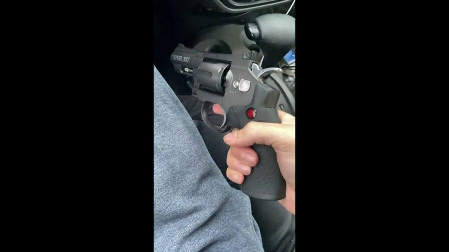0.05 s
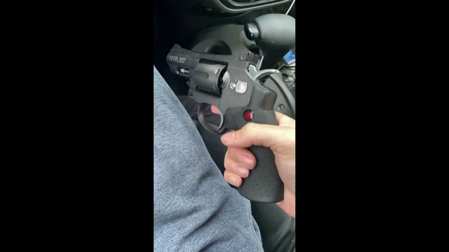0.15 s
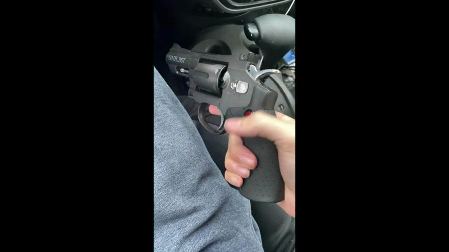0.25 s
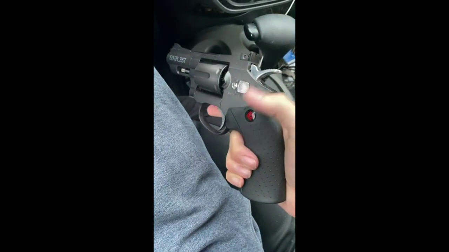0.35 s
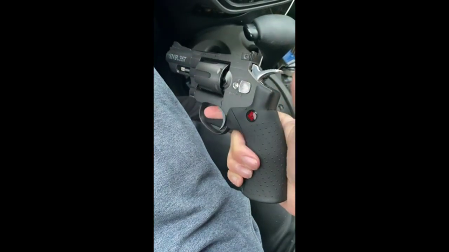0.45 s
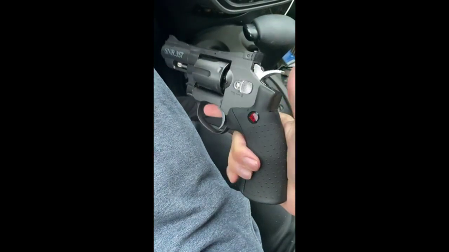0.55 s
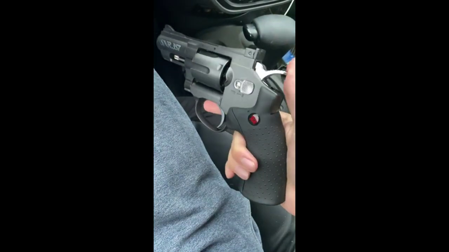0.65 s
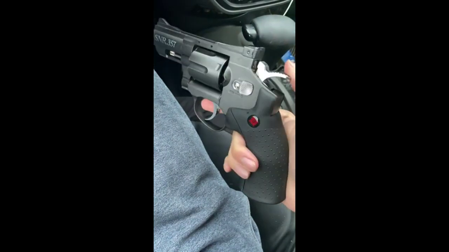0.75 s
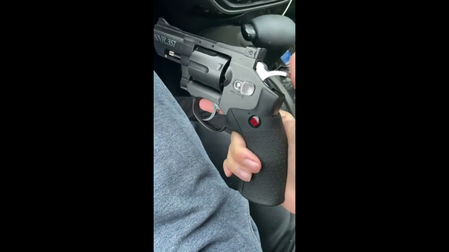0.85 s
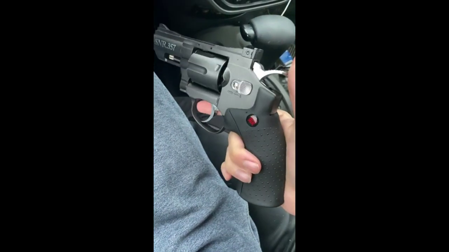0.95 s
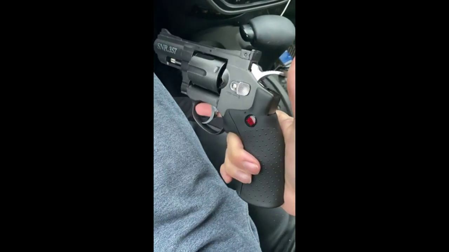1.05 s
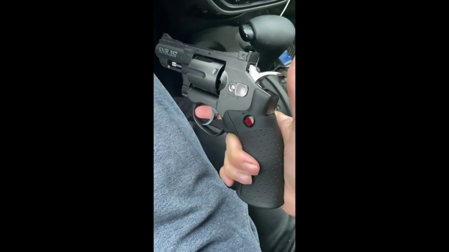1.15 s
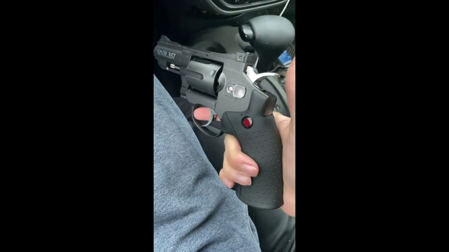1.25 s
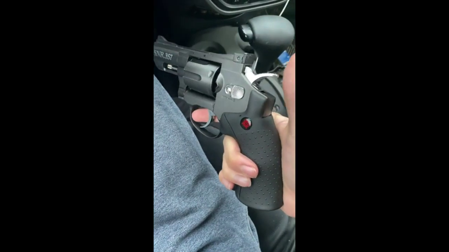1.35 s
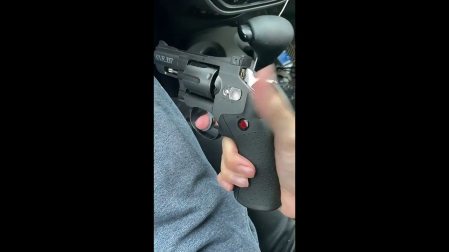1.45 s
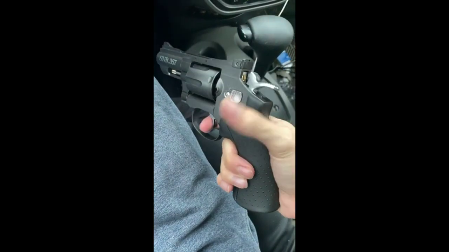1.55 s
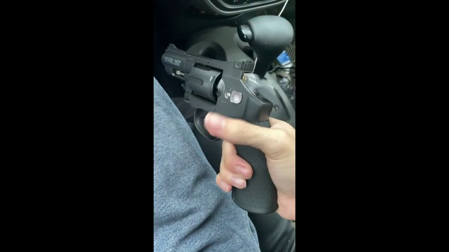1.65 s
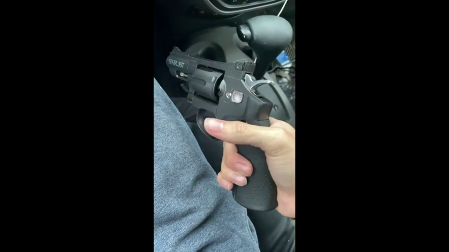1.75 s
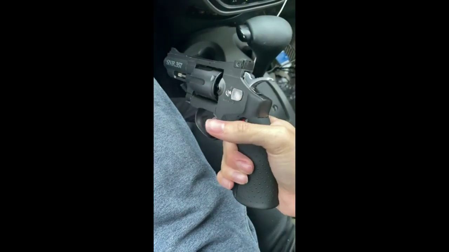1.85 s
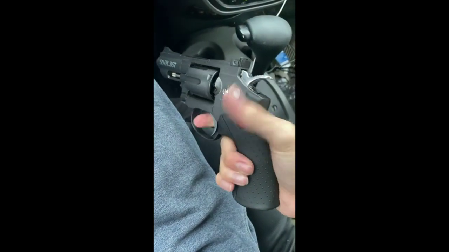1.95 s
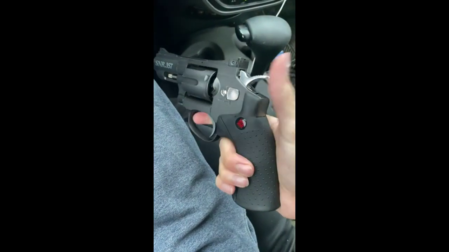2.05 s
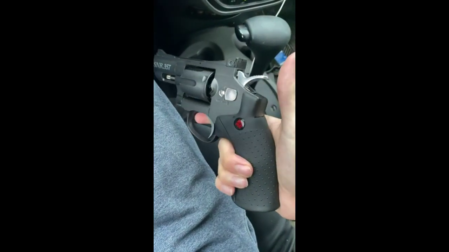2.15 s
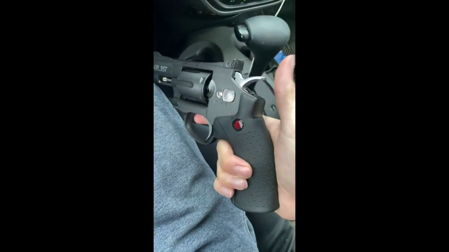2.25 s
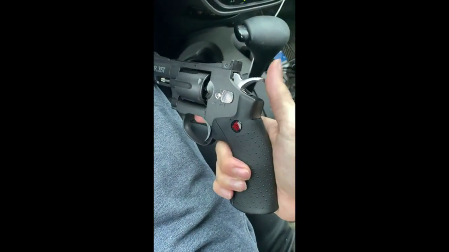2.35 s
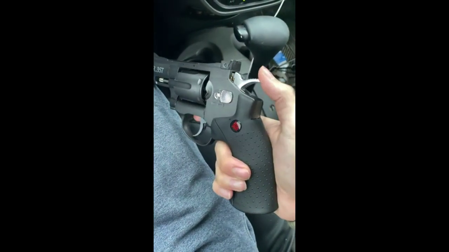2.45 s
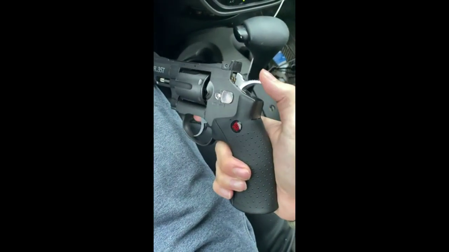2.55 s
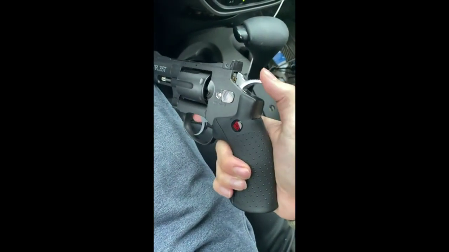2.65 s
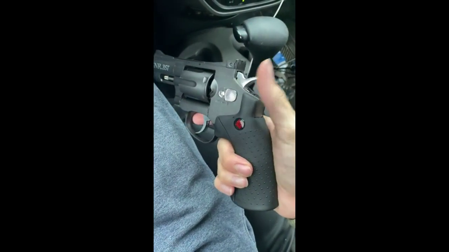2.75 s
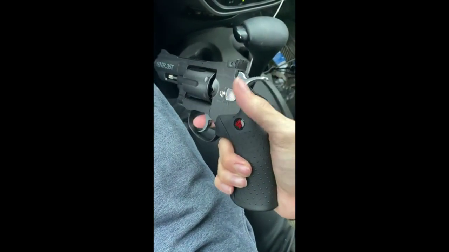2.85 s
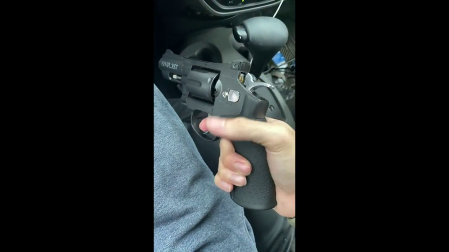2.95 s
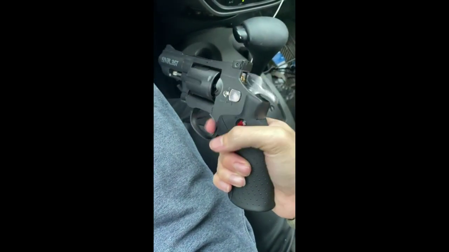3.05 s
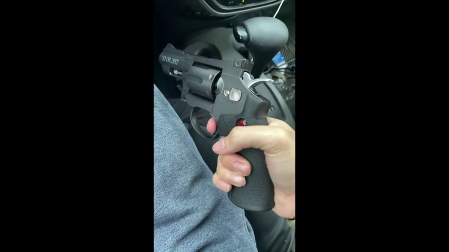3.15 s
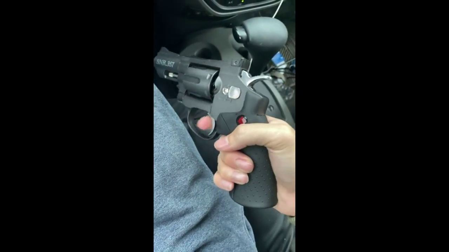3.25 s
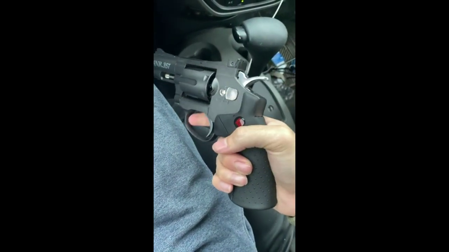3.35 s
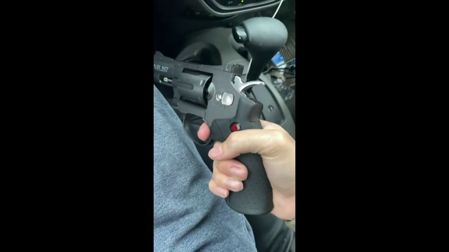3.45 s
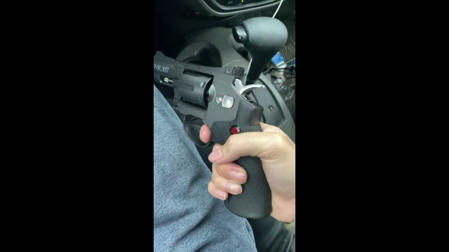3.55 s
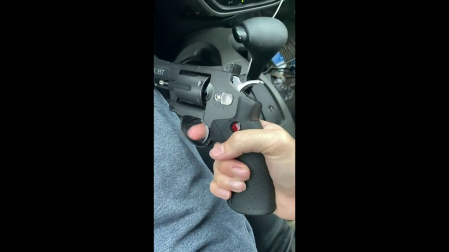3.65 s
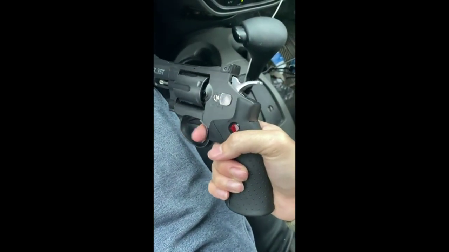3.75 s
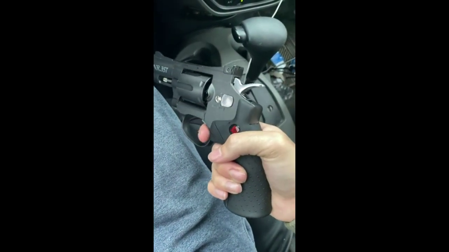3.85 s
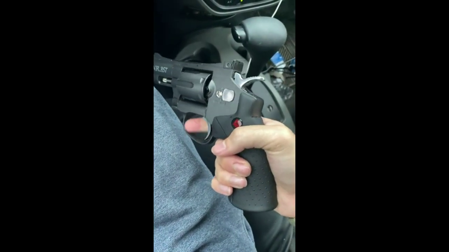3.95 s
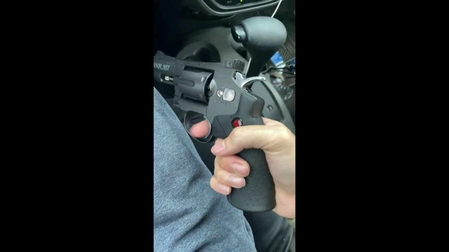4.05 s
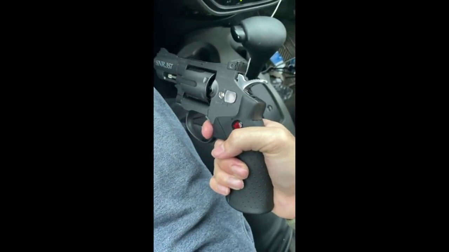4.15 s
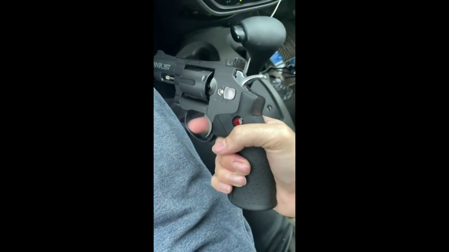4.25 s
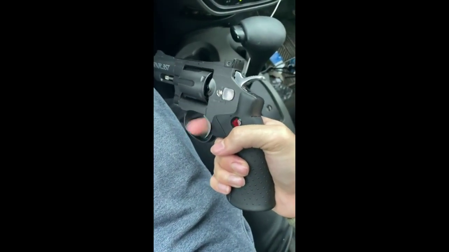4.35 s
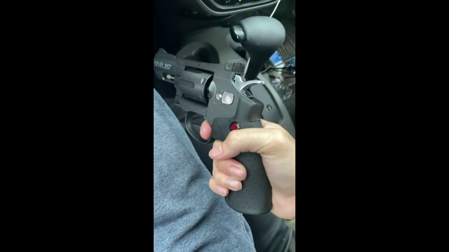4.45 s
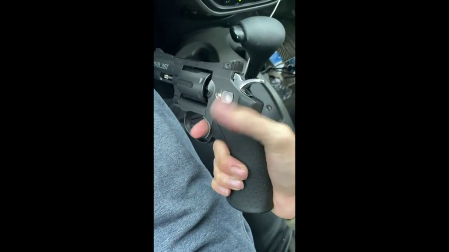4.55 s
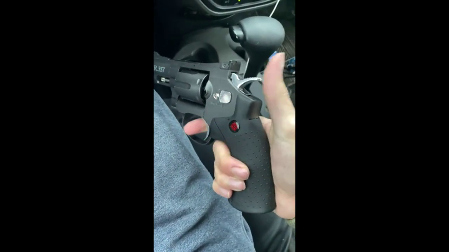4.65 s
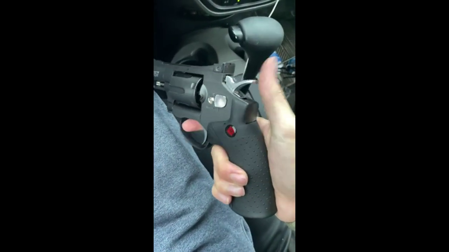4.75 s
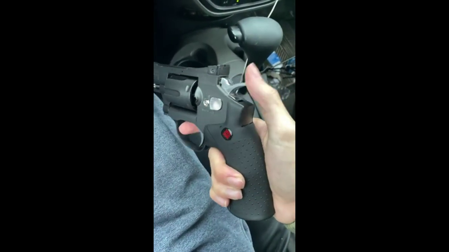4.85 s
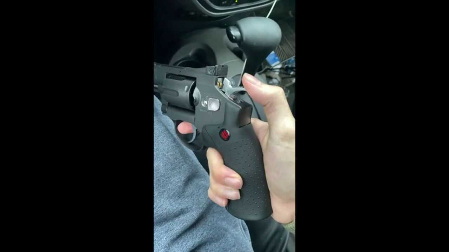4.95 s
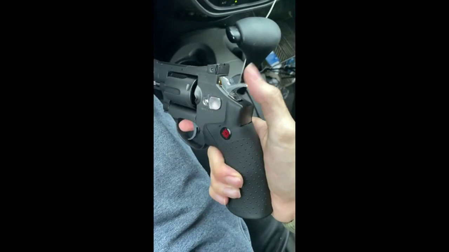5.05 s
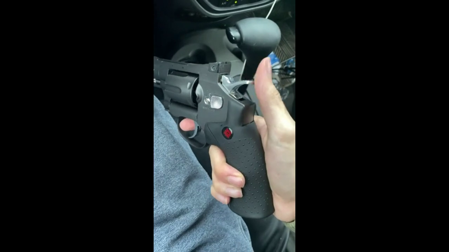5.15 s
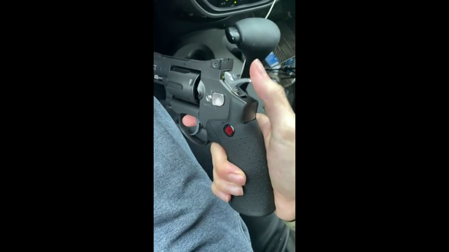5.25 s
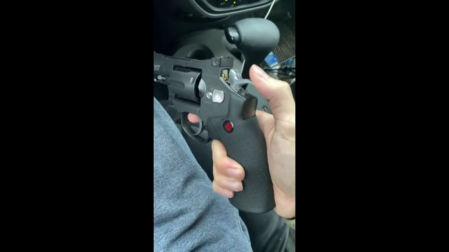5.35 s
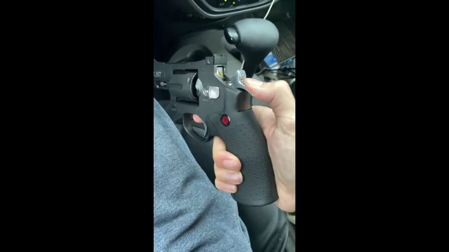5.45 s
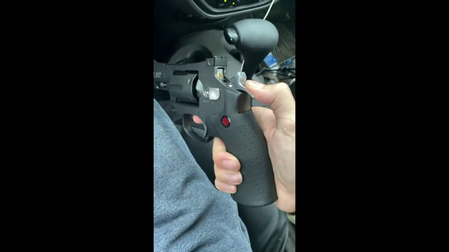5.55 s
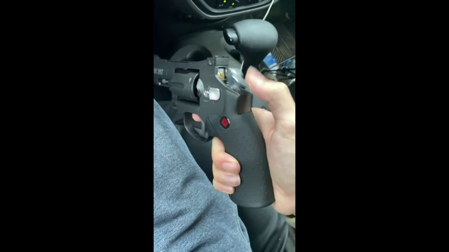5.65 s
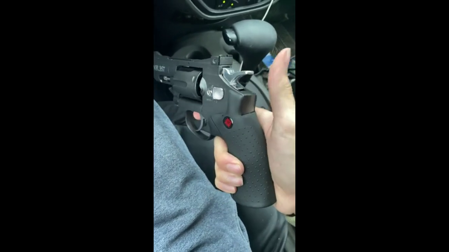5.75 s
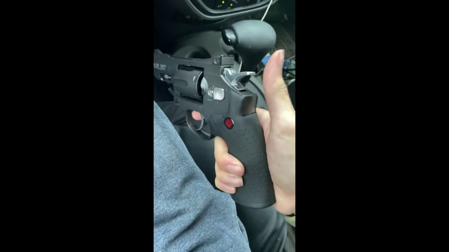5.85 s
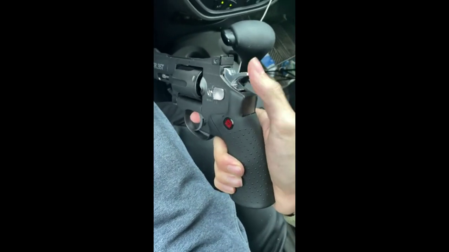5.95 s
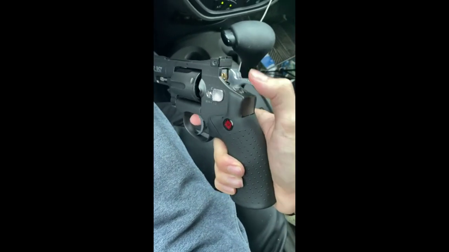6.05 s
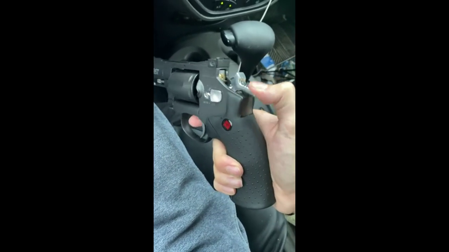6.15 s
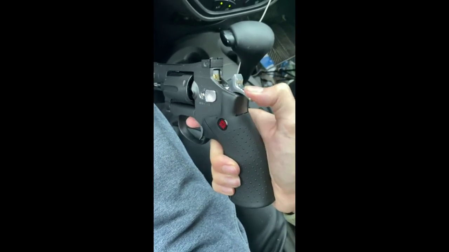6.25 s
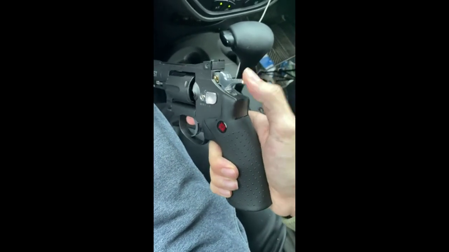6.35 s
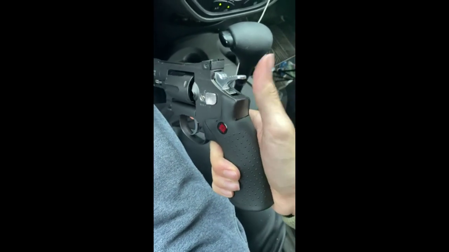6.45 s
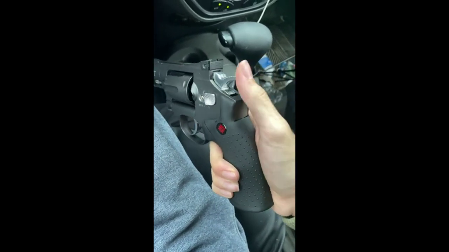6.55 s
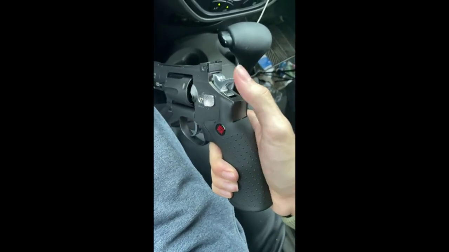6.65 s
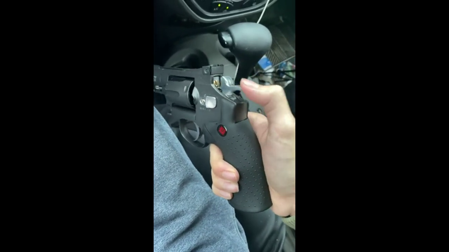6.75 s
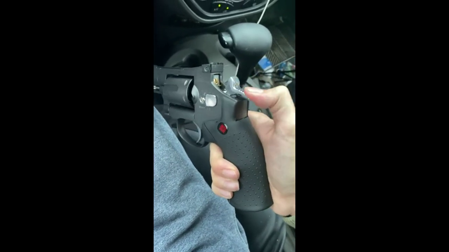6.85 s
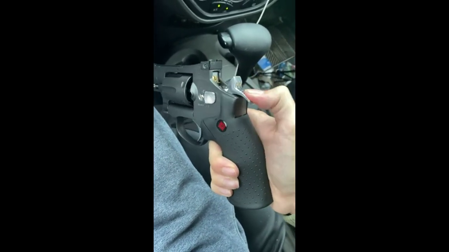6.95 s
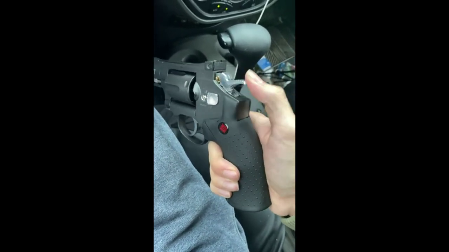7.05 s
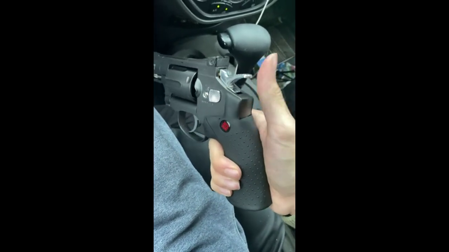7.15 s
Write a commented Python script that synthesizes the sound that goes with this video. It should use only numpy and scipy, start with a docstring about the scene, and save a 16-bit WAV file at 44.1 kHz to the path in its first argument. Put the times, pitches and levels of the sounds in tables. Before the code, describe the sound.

Close up in an idling car, a hand works an empty air revolver. Four loud hammer snaps ring briefly on the metal frame, then the loose trigger ticks faintly. Another hard snap follows, then quieter cylinder and trigger knocks with short ratcheting slides. Low engine boom, fan air and slight skin rustle continue underneath. A phone-like microphone briefly ducks the engine at loud hits.

```python
"""An air revolver is cocked and dry-fired in the driver's seat of an idling car, close to a phone.
Hammer, cylinder latch and trigger linkage strike one metal frame: noisy cracks, then short decaying modes.
Steel slides as streams of tiny slips, skin rustles as filtered noise, and the mainspring sings faintly.
The engine booms as sines on the crank rate under a fan tone and cabin noise; a limiter ducks loud bursts."""
import sys
import numpy as np
from scipy import signal
from scipy.fft import rfft, irfft
from scipy.io import wavfile
from scipy.ndimage import uniform_filter1d, minimum_filter1d

SR = 44100
rng = np.random.default_rng(int(sys.argv[2]) if len(sys.argv) > 2 else 0)


def waveform_to_disk(signal):
    """Save audio, clipped to [-1, 1], as 16-bit WAV at the path in sys.argv[1]."""
    frames = np.transpose(np.atleast_2d(signal))
    scaled = np.clip(frames, -1, 1) * 32767
    samples = np.round(scaled).astype(np.int16)
    wavfile.write(sys.argv[1], SR, samples)


N = 317520
HIT_SIZE = 4608  # length of one metal contact, samples
SIDES = np.array([[1], [-1]])  # left, right

# Levels of blows are relative drives; brightness and thump are strengths of the curves in blow().
# Hammer falls. Each row: fall in seconds, level in dB, brightness in dB, thump in the grip in dB,
# trip of the sear in dB, rebound after in seconds, rebound level in dB, rebound brightness in dB.
HAMMER_FALLS = [(0.6825, -4, 10, 4, -15.5, 0.0051, -3.5, -0.5), (1.6109, -1.5, 5, 5, -3.5, .0094, 3, -2),
                (2.4408, 1, 3, 4, -11.5, .0044, -3.5, 10.5), (3.0393, 2, 4.5, -0.5, -5.5, 0.011, 2.5, -1.5),
                (4.8345, -4, -1, 14.5, -17.5, .0028, 1, 13.5)]
# Knocks after the sear: the cylinder locks with a bright ping at 5.42 and 6.85 s; the others are duller
# trigger or hammer stops. Each row: knock in seconds, level in dB, brightness in dB, hollow body in dB,
# ping in dB, sear earlier by seconds, sear level in dB.
ACTION_STOPS = [(5.4197, -10.5, 3, 3, -8.5, 0.0053, -18), (5.6452, -13.5, -1.5, -12, -33, 0.0053, -10.5),
                (6.1525, -22, -7, -2.5, -37, 0.017, -14), (6.3401, -18.5, -4, -13, -22, .0214, -25),
                (6.8464, -10, 4.5, 4.5, -25, 0.0042, -21.5)]
# Single clicks of trigger and hammer. Each row: start in seconds, level in dB, brightness in dB.
CLICKS = [(0.2509, -59, -3), (0.8235, -27, -8.5), (1.4452, -31, 7), (1.457, -30, -7), (1.78, -50, -21.5),
          (2.409, -48, -11), (2.638, -49.5, -32), (2.6706, -38, -9.5), (2.832, -42, -24),
          (2.9134, -21.5, 4), (3.18, -47, -15.5), (5.0241, -37, -3), (5.054, -33, -5.5),
          (5.2553, -33.5, -18), (5.2912, -44, -19), (5.3305, -41.5, -13.5), (5.926, -55.5, -11),
          (6.0009, -21.5, 5), (6.6621, -32.5, -22), (6.6866, -32.5, 22.5), (6.7977, -29, 2),
          (7.0109, -20, 17), (7.0403, -24, 4)]
# Pulls on trigger or hammer: steel slides and the pawl chatters. Each row: start in seconds, end in seconds,
# sliding level at the end in dB, chatter level in dB, chatter brightness in dB.
ACTION_PULLS = [(0.672, 0.682, -37, -53, -6), (1.5897, 1.607, -32, -19, 5),
                (2.43, 2.439, -39.5, -49, -11.5), (3.0217, 3.035, -34, -21.5, -2),
                (4.817, 4.831, -45.5, -62, -8), (5.4008, 5.417, -35.5, -28.5, -7),
                (5.616, 5.64, -29.5, -27, -7), (5.9789, 6.036, -53.5, -36, -23),
                (6.1138, 6.15, -29, -23, -3), (6.2914, 6.339, -36, -25, 2), (6.647, 6.73, -68, -40, -18.5),
                (6.998, 7.069, -45, -35, -15)]
# Modes of frame and cylinder, before each blow's scatter. Each row: pitch in Hz, level in dB, T60 in seconds.
FRAME_MODES = [(1940, -24.5, .06), (2061, -23.5, .055), (2129, -16.5, 0.062), (2206, -22.5, 0.035),
               (2353, -25.5, 0.08), (2763, -26, .07), (3210, -27.5, 0.03), (3520, -29.5, 0.049),
               (4110, -23, .045), (4690, -26.5, .06), (5320, -20.5, 0.052), (5660, -24, .045),
               (5800, -20.5, 0.056), (5990, -17.5, 0.047), (6530, -21, 0.046), (9260, -24, 0.078),
               (9820, -23.5, 0.066), (12900, -29, .07)]


def undb(db):
    """Decibels to gain."""
    return 10 ** (np.asarray(db) / 20)


def fade(t, t60):
    """Exponential decay, 60 dB down after t60."""
    return np.exp(-np.log(1000) * t / t60)


def freqs(size):
    """Frequency of each bin of a spectrum, kept above zero."""
    return np.maximum(np.fft.rfftfreq(size, 1 / SR), 1)


def over_hz(points, hz):
    """Join (Hz, value) points on a log-frequency axis."""
    at, value = np.transpose(points)
    return np.interp(np.log(hz), np.log(at), value)


def walk(rate):
    """Random levels held 1 / rate seconds and slewed twice; spread near 1."""
    k = int(SR / rate)
    steps = np.repeat(rng.standard_normal(N // k + 1), k)
    return np.sqrt(2) * uniform_filter1d(uniform_filter1d(steps, k), k)[:N]


def add(out, s, sound):
    """Mix a sound in at time s."""
    start = int(s * SR)
    out[:, start:start + sound.shape[1]] += sound[:, :N - start]


def cabin(flicker_db=0.94):
    """Noise shaped into rumble, alike on both sides, and diffuse air from the vents."""
    # Rumble and fan air. Each row: frequency in Hz, level in dB per Hz.
    air_colour = [(20, -76.5), (55, -60.5), (90, -65.5), (135, -68.5), (200, -71.5), (310, -78.5),
                  (400, -74.5), (500, -81.5), (700, -88), (1100, -91.5), (2200, -103), (4200, -118),
                  (7000, -130), (10000, -128), (16000, -142)]
    # Likeness of the two sides. Each row: frequency in Hz, coherence from 0 to 1.
    side_likeness = [(60, 0.89), (130, 0.99), (290, 0.92), (640, 0), (1400, 0)]
    hz = freqs(N)
    alike = np.clip(over_hz(side_likeness, hz), 0, 1)
    mid, side = rfft(rng.standard_normal((2, N))) * undb(over_hz(air_colour, hz)) * np.sqrt(SR / 4)
    # left minus right, dB
    pan_db = over_hz([(200, 0.5), (380, -5.5), (700, 1), (1290, 3.5), (2400, -2), (8000, 1)], hz)
    stereo = mid * np.sqrt(1 + alike) + SIDES * side * np.sqrt(1 - alike)
    air = irfft(stereo * undb(SIDES * pan_db / 2), N)
    return air * undb(flicker_db * walk(9.7))


def blower(blade_hz=374.9, level_db=-54, pan_db=-3, waver=.002, flutter_db=2.4):
    """The blade tone of the heater fan: a sine wavering in pitch and level, stronger on the right."""
    angle = 2 * np.pi * np.cumsum(blade_hz * (1 + waver * walk(6))) / SR
    return np.sqrt(2) * np.sin(angle) * undb(level_db + flutter_db * walk(8.2) + SIDES * pan_db / 2)


def engine(wobble_db=2.5, jitter=0.54, firing_wobble_db=.3):
    """A four-cylinder idle: a firm boom at twice the crank rate, the other orders varying with uneven combustion."""
    # Each row: multiple of the crank rate, mean level in dB RMS.
    crank_orders = [(1, -55.5), (2, -27.5), (3, -42), (4, -51), (5, -49), (6, -55), (7, -56.5), (8, -60.5),
                    (9, -67)]
    firing_hz, hunt_hz, hunts_per_s = 47.85, .22, 2.2
    # two firings per turn, so the crank turns at half the firing rate
    crank = np.pi * np.cumsum(firing_hz + hunt_hz * walk(hunts_per_s)) / SR
    out = 0
    for order, db in crank_orders:
        unsteady_db, drift = (firing_wobble_db, 0) if order == 2 else (wobble_db, jitter)
        angle = order * crank + 2 * np.pi * rng.random() + drift * walk(8.3)
        out = out + np.sqrt(2) * undb(db + unsteady_db * walk(12)) * np.sin(angle)
    return out


def rustle(catch_db=1.14, rest_db=-82, work_db=-73.5, reach_s=.09):
    """Skin catches and slips on the grip as hiss, most around the moments when the action is worked."""
    # Colour of skin on the grip. Each row: frequency in Hz, relative level in dB.
    skin_colour = [(800, -13), (2200, 8), (5500, -1.5), (7500, -9.5), (10000, 1), (13000, -13.5),
                   (16000, -19)]
    t, effort = np.arange(N) / SR, np.zeros(N)
    for s, *_ in [*HAMMER_FALLS, *ACTION_STOPS, *CLICKS]:
        effort = np.maximum(effort, 1 / (1 + ((t - s) / reach_s) ** 2))
    hiss = irfft(rfft(rng.standard_normal((2, N))) * undb(over_hz(skin_colour, freqs(N))), N)
    level_db = rest_db + (work_db - rest_db) * effort + catch_db * walk(120)
    return hiss / hiss.std() * undb(level_db)


def hand(t60=0.16):
    """Dull thumps as the grip shifts: low sines that swell briefly and die away."""
    # Soft bumps. Each row: start in seconds, pitch in Hz, level before the envelope in dB.
    grip_bumps = [(6.777, 65.5, -16), (7.146, 71.7, -16.5)]
    out, t = np.zeros((2, N)), np.arange(SR // 2) / SR
    for s, hz, db in grip_bumps:
        envelope = fade(t, t60) * (1 - fade(t, 0.055))
        add(out, s, undb(db) * (np.sin(2 * np.pi * hz * t) * envelope)[None])
    return out


def ringing(modes, t, detune=0.0018, scatter_db=3):
    """Decaying modes; every blow and each microphone port weights them a little differently."""
    hz, db, t60 = np.transpose(modes)
    # the grip of the hand shifts each mode slightly
    hz = hz * (1 + detune * rng.standard_normal(len(hz)))
    poles = np.exp((2j * np.pi * hz - np.log(1000) / t60) / SR)
    size = undb(db + scatter_db * rng.standard_normal((2, len(hz))))
    phased = size * np.exp(2j * np.pi * rng.random((2, len(hz))))
    # powers of each pole spiral inward: a decaying sinusoid
    spirals = np.cumprod(np.repeat(poles[:, None], len(t), axis=1), axis=1)
    return np.einsum("cm,mt->ct", phased, spirals).imag


def mainspring(split_hz=45, pitch_hz=5300, t60_s=0.81):
    """A thin lingering tone from the coil behind the hammer after three of the jolts; its close modes beat."""
    # Each row: start in seconds, level of each mode before scatter in dB.
    spring_jolts = [(4.838, -75), (5.645, -80), (6.152, -79)]
    out, t = np.zeros((2, N)), np.arange(SR) / SR
    for s, db in spring_jolts:
        modes = [(hz, db, t60_s) for hz in (pitch_hz - split_hz, pitch_hz, pitch_hz + split_hz)]
        add(out, s, ringing(modes, t))
    return out


def patches(hz, width_hz, depth_db):
    """A gain that rises and falls at random along frequency."""
    knots = np.arange(0, SR / 2, width_hz)
    gain = undb(depth_db * np.interp(hz, knots, rng.standard_normal(len(knots))))
    return gain / np.sqrt(np.mean(gain ** 2))


def at_ports(spectrum, hz, lag_s=.000152):
    """The treble of the direct sound, above 3500 Hz, reaches the right port later."""
    late = np.exp(-2j * np.pi * lag_s * np.maximum(hz - 3500, 0))
    return spectrum * np.array([np.ones(len(hz)), late])


def blow(modes, bright_db, crack_t60, modes_db, ring_db, ring_t60, body_db):
    """One metal contact: a short crack, then the frame's modes and a dense ring mixed with cabin reflections."""
    # Colour of the contact crack. Each row: frequency in Hz, relative level in dB.
    crack_colour = [(150, -18), (400, -10.5), (700, -17.5), (1300, -12.5), (2100, -2), (3200, -11.5),
                    (4700, -3), (6000, 5.5), (7500, 0), (10000, -3), (13000, -3), (15500, -1)]
    # Colour of the dense ring after it. Each row: frequency in Hz, relative level in dB.
    ring_colour = [(150, -15), (400, -8), (700, -11.5), (1500, -5.5), (2100, 5.5), (3200, 2), (4800, 3),
                   (5900, 5.5), (7500, -6), (10000, -1), (13000, -4), (15500, -4.5)]
    # Where the gun sits between the ports. Each row: frequency in Hz, left minus right in dB.
    gun_place = [(500, -3.5), (1100, -6.5), (2100, -1), (3000, -1), (4400, -5.5), (5800, 0.5),
                 (14000, -0.5)]
    size = HIT_SIZE + HIT_SIZE // 3  # zero-padded spectrum
    t, hz = np.arange(HIT_SIZE) / SR, freqs(size)
    # each point of contact favours its own clusters of the frame's many close modes
    favoured = patches(freqs(HIT_SIZE), width_hz=130, depth_db=5)
    noise = irfft(rfft(rng.standard_normal((3, HIT_SIZE))) * favoured)
    # the first touch is the hardest; the parts chatter for a few milliseconds more
    contact = .7 * fade(t, crack_t60) + fade(t, .004)
    crack = at_ports(rfft(noise[0] * contact, size) * undb(over_hz(crack_colour, hz)), hz)
    ring_envelope = fade(t, ring_t60) * (1 - fade(t, 0.011))
    ring = rfft(noise[1:] * ring_envelope, size) * undb(ring_db + over_hz(ring_colour, hz))
    ring = ring + undb(modes_db) * rfft(ringing(modes, t), size)
    # harder contact is brighter, most of all in the crack; heavy parts also shake the grip
    tilt_db = bright_db * over_hz([(2000, -0.4), (5500, 0.1), (10000, 0.5), (15000, 0.7)], hz)
    thump_db = body_db * over_hz([(500, 0.91), (1800, 0.064)], hz)
    colour_db = thump_db + SIDES * over_hz(gun_place, hz) / 2
    hit = (crack * undb(tilt_db) + ring * undb(.6 * tilt_db)) * undb(colour_db)
    return irfft(hit)[:, :HIT_SIZE]


def sliding(swell_db=15, grain_db=5, slips_per_s=1800):
    """Steel slides on steel in pulls and before clicks: a swelling stream of tiny slips, each ringing the frame."""
    take_up_s = .007  # sliding starts this long before the pawl catches
    lead_in_s, lead_in_db = 0.016, -23.5  # short slide into a click, level against the click
    out = np.zeros((2, N))
    slides = [(start - take_up_s, end, db) for start, end, db, *_ in ACTION_PULLS]
    slides += [(s - lead_in_s, s, db + lead_in_db) for s, db, _ in CLICKS]
    for start, end, db in slides:
        count = int((end - start) * SR)
        chance, size = rng.random(count), rng.standard_normal(count)
        slips = (chance < slips_per_s / SR) * np.sign(size) * undb(grain_db * np.abs(size))
        slips = slips / (slips.std() + 1e-9) * undb(db + np.linspace(-swell_db, 0, count))
        frame = blow(FRAME_MODES, bright_db=-7.5, crack_t60=0.019, modes_db=1,
                     ring_db=-7, ring_t60=0.067, body_db=-7.5)
        unit_frame = frame / np.sqrt((frame ** 2).sum() / 2)
        add(out, start, signal.fftconvolve(slips[None], unit_frame))
    return out


def sear_ticks():
    """The sear trips before each fall and each stop; the trigger settles after each rebound."""
    trip_lead_s, trip_bright_db = 0.0037, 7
    # settling level is against the rebound
    settle_s, settle_db, settle_bright_db = .032, -26, -15
    stop_bright_db = -4.5
    ticks = [(s - lead, sear_db, stop_bright_db) for s, *_, lead, sear_db in ACTION_STOPS]
    for s, *_, trip_db, after, rebound_db, _ in HAMMER_FALLS:
        ticks.append((s - trip_lead_s, trip_db, trip_bright_db))
        ticks.append((s + after + settle_s, rebound_db + settle_db, settle_bright_db))
    return ticks


def bouncing_ticks(bounce_s=0.0015, bounce_db=-9.5, bounce_bright_db=-10.5):
    """Each single click and its weaker, duller bounce."""
    bounces = [(s + bounce_s, db + bounce_db, bright_db + bounce_bright_db) for s, db, bright_db in CLICKS]
    return [*CLICKS, *bounces]


def play_ticks(level_db=-46, fade_db_per_s=-5, bright_db=-13, scatter_db=2.6):
    """The finger rocks the loose trigger, which ticks at each end of its play, unevenly, and weaker on the whole."""
    # Moments of the ticks, in seconds.
    play_ends = [3.467, 3.584, 3.775, 3.878, 3.963, 4.08, 4.189, 4.272, 4.379, 4.489]
    ticks = []
    for s, (hard, sharp) in zip(play_ends, rng.standard_normal((len(play_ends), 2))):
        db = level_db + fade_db_per_s * (s - play_ends[0]) + scatter_db * hard
        ticks.append((s, db, bright_db + 2 * scatter_db * sharp))
    return ticks


def pawl_ticks(count=8):
    """The pawl catches as a pull starts, then skips unevenly along the ratchet until the pull ends."""
    gap_s, jitter_s = .0125, 0.0021
    skip_db, skip_bright_db, scatter_db = -3, -4, 2  # against the first catch
    ticks = []
    for start, end, _, db, bright_db in ACTION_PULLS:
        ticks.append((start, db, bright_db))
        for k, (late, hard, sharp) in enumerate(rng.standard_normal((count, 3)), 1):
            s = start + k * gap_s
            if s < end:
                skip_level_db = db + skip_db + scatter_db * hard
                ticks.append((s + jitter_s * late, skip_level_db, bright_db + skip_bright_db + 2 * scatter_db * sharp))
    return ticks


def linkage(gain_db=-2.0):
    """Light ticks of trigger, sear and pawl: small, short blows on the frame."""
    out = np.zeros((2, N))
    for s, db, bright_db in sear_ticks() + bouncing_ticks() + play_ticks() + pawl_ticks():
        tick = blow(FRAME_MODES, bright_db, crack_t60=0.0088, modes_db=-1.5,
                    ring_db=-8, ring_t60=.062, body_db=1.5)
        add(out, s, undb(db + gain_db) * tick)
    return out


def action_stops():
    """Cylinder, trigger or hammer knocks against its stop and rocks back once, waking frame and ping modes."""
    # Further modes that these knocks wake. Each row: pitch in Hz, level in dB, T60 in seconds.
    extra_modes = [(886, -24.5, 0.078), (1048, -23, 0.054), (1127, -23, 0.042), (1418, -27, 0.064),
                   (5800, -5, 0.041)]
    ping_hz, ping_t60_s = 12530, 0.08
    rock_s, rock_db, rock_bright_db = .0068, -11, -18.5  # against the first knock
    out = np.zeros((2, N))
    for stop, stop_db, stop_bright_db, hollow_db, ping_db, *_ in ACTION_STOPS:
        modes = [*FRAME_MODES, *extra_modes, (ping_hz, ping_db, ping_t60_s)]
        first = (stop, stop_db, stop_bright_db)
        rock = (stop + rock_s, stop_db + rock_db, stop_bright_db + rock_bright_db)
        for s, db, bright_db in [first, rock]:
            knock = blow(modes, bright_db, crack_t60=0.02, modes_db=-2.0,
                         ring_db=-6.0, ring_t60=0.074, body_db=hollow_db)
            add(out, s, undb(db) * knock)
    return out


def hammer():
    """The hammer slams onto the valve stem and rebounds: two hard blows on the frame."""
    out = np.zeros((2, N))
    for fall, fall_db, fall_bright_db, thump_db, _, after, rebound_db, rebound_bright_db in HAMMER_FALLS:
        slam = (fall, fall_db, fall_bright_db)
        rebound = (fall + after, rebound_db, rebound_bright_db)
        for s, db, bright_db in [slam, rebound]:
            hit = blow(FRAME_MODES, bright_db, crack_t60=0.024, modes_db=1.0,
                       ring_db=-6.5, ring_t60=0.07, body_db=thump_db)
            add(out, s, undb(db) * hit)
    return out


def scene():
    """The idling car, and over it the hand and the action of the gun that it works."""
    car = cabin() + blower() + engine()
    handling = rustle() + hand()
    action = mainspring() + sliding() + linkage() + action_stops() + hammer()
    return car + handling + action


def limiter(x, threshold_db=-16, slope=0.63, attack_s=0.0039, hold_s=0.093, release_s=0.028, bass_lag_s=0.0053):
    """Turns down loud bursts, holds, then recovers; the bass follows a moment later."""
    power = uniform_filter1d((x ** 2).mean(0), int(0.011 * SR))
    level_db = 10 * np.log10(np.maximum(power, 1e-12))
    cut_db = -slope * np.maximum(level_db - threshold_db, 0)
    hold = int(hold_s * SR)
    held_db = minimum_filter1d(cut_db, hold, origin=(hold - 1) // 2)
    pole = np.exp(-1 / (release_s * SR))
    released_db = signal.lfilter([1 - pole], [1, -pole], held_db)
    gain_db = uniform_filter1d(np.minimum(held_db, released_db), int(attack_s * SR))
    late_db = np.interp(np.arange(N) - bass_lag_s * SR, np.arange(N), gain_db)
    bass = signal.sosfiltfilt(signal.butter(2, 250, fs=SR, output="sos"), x)
    # the treble is turned down slightly less than the bass
    return (x - bass) * undb(0.99 * gain_db) + bass * undb(late_db)


def record(dry):
    """The phone limits the level, rounds the last peaks and cuts the top above 15.8 kHz."""
    rounded = np.tanh(limiter(dry))
    to_edge = np.minimum(np.arange(N), np.arange(N)[::-1])
    ends = np.minimum(1, to_edge / (.004 * SR))  # 4 ms fade in and out
    top_cut = signal.ellip(10, .2, 70, 15800, fs=SR, output="sos")
    return signal.sosfilt(top_cut, rounded * ends)


dry = scene()
out = record(dry)
waveform_to_disk(out)
```